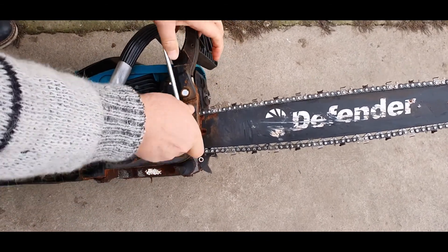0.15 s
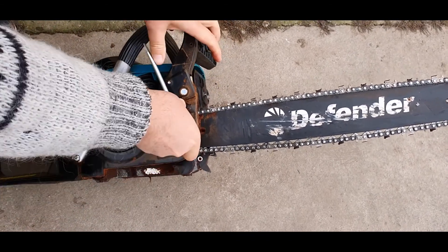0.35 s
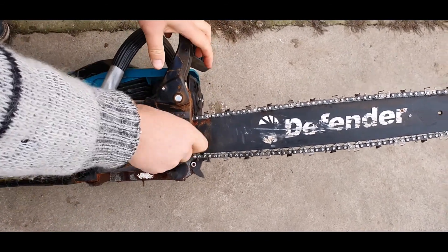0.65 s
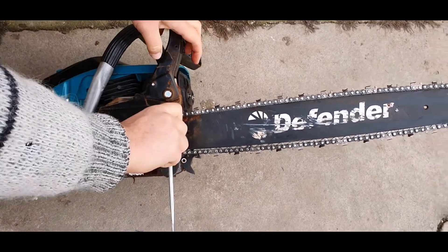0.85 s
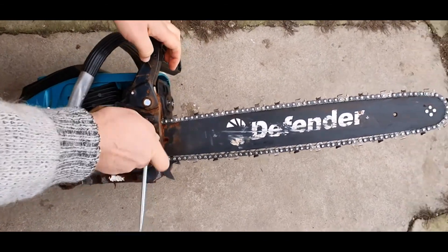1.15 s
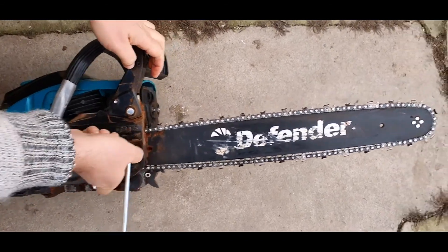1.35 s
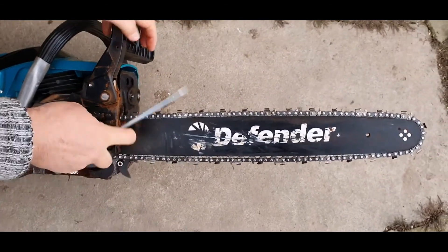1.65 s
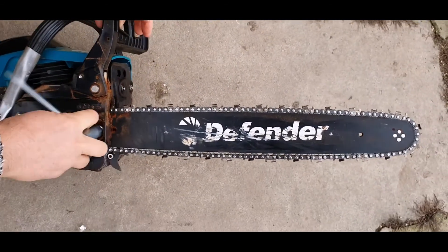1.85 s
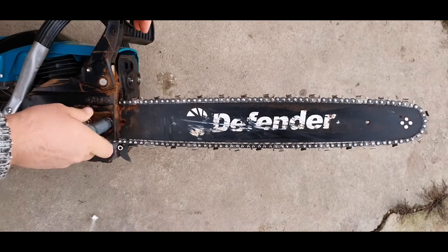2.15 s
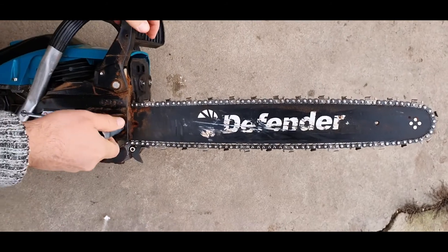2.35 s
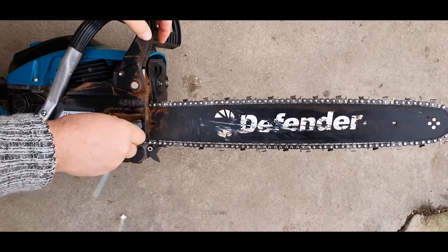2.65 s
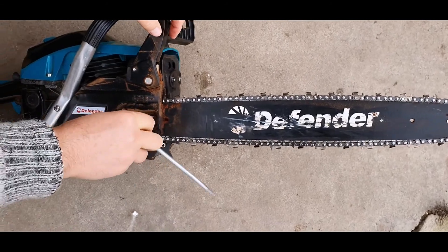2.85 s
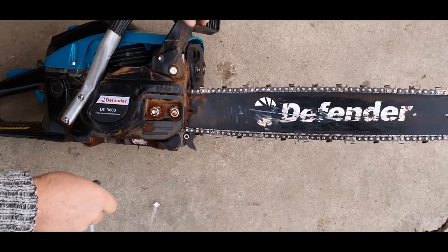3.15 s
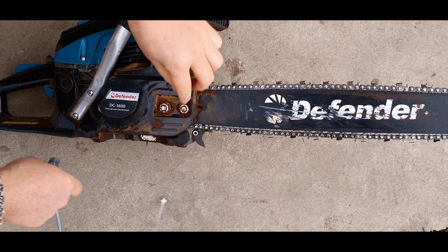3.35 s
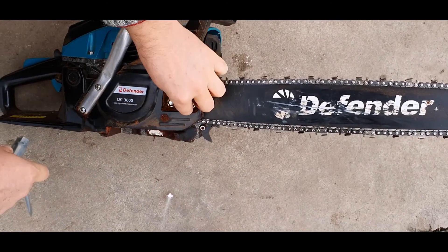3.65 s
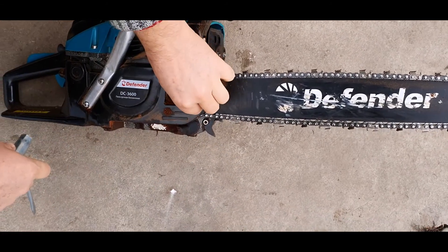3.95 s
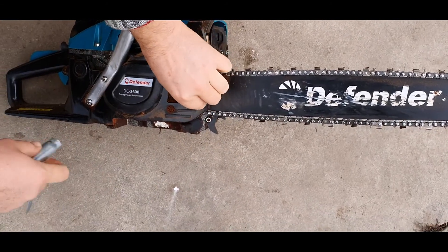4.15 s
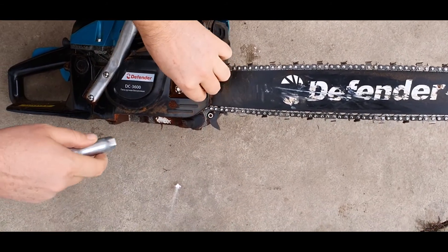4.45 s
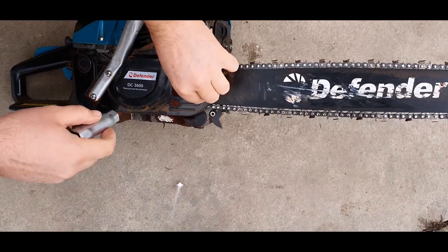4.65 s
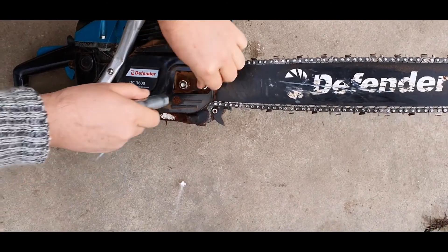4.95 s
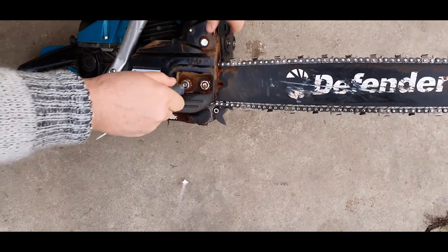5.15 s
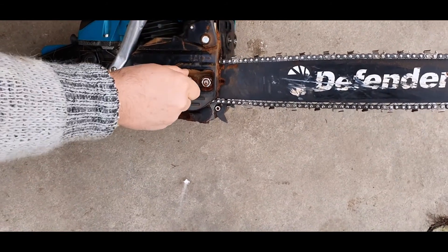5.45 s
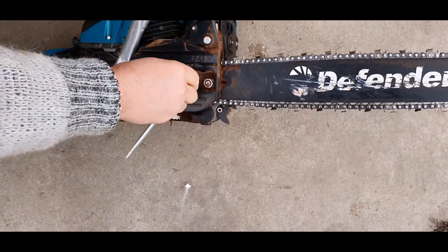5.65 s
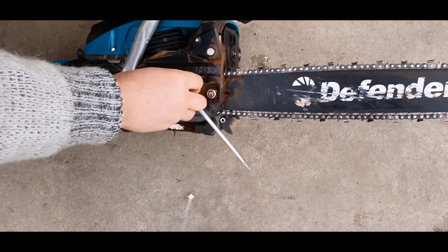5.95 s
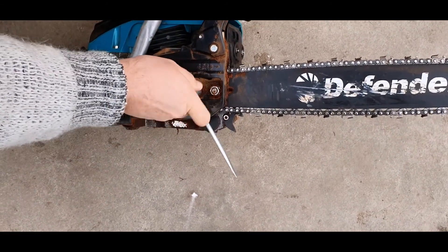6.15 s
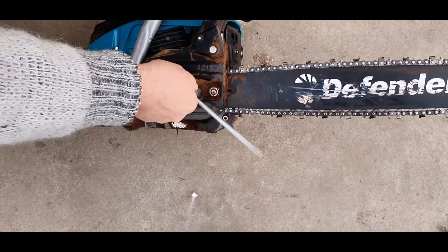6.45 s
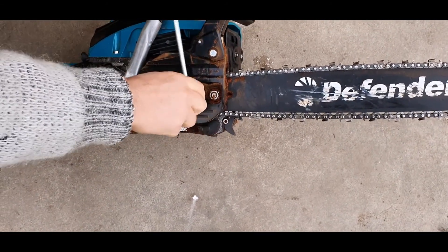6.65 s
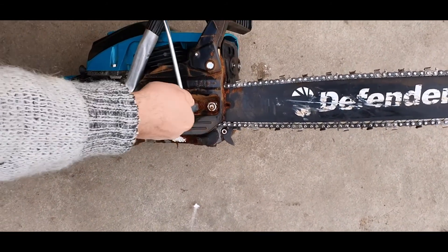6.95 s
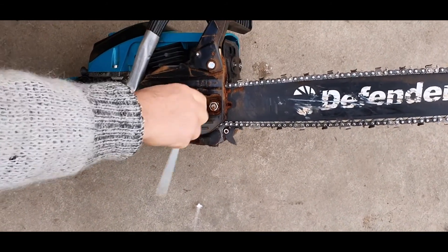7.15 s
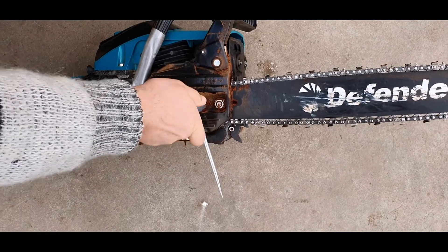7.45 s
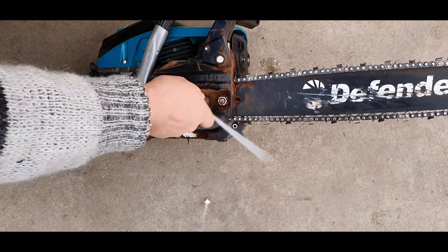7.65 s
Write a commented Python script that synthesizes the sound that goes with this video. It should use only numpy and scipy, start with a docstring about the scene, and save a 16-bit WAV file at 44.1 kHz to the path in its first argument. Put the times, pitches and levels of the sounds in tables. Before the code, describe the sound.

Outdoors on concrete beside a road, a vehicle approaches with low rumble, engine drone and tyre hiss, swells to its loudest near the middle and recedes at a lower engine pitch. Close up, a steel wrench makes faint ticks, then sharp clacks on a chainsaw cover around two seconds. A loud dry snap and softer knocks come just after five, then small ticks and light scrapes. Close stereo microphones, very short outdoor reflections.

```python
"""Outdoors on concrete by a road: a steel socket wrench works the two cover nuts of a chainsaw.
Knocks are damped modes of cover and wrench plus a noise crack; dry ticks are short snaps with grit;
scrapes are swells of clumped noise; the wrench sings briefly at its strongest mode.
A motor vehicle drives by: engine lines and coloured road noise swell and fade with distance,
and the engine slows as it leaves. Two close microphone ports hear it all."""
import sys
import numpy as np
from scipy import signal
from scipy.fft import rfft, irfft
from scipy.io import wavfile
from scipy.ndimage import uniform_filter1d, map_coordinates

SR = 44100
rng = np.random.default_rng(int(sys.argv[2]) if len(sys.argv) > 2 else 0)


def log_audio(samples):
    """Write samples as a 16-bit WAV file to the path given in sys.argv[1]."""
    # one column per channel
    frames = np.atleast_2d(samples).T
    # limit to full scale, then quantise
    limited = np.clip(frames, -1, 1)
    pcm = np.round(limited * 32767).astype(np.int16)
    wavfile.write(sys.argv[1], SR, pcm)


N = 343980
TIME_S = np.arange(N) / SR
BINS_HZ = np.fft.rfftfreq(N, 1 / SR)

# Vehicle levels are before the trims in its functions; spectra are relative.
# Engine speed, dropping as the driver eases off: (time [s], firing rate [Hz])
FIRING_RATE = [(0, 80.73), (.85, 81.85), (1.15, 87.45), (2.2, 91.73), (3.8, 95.33), (6.15, 92.6),
               (6.55, 77.05), (6.9, 76.3), (7.8, 76.3)]
# Exhaust drone near the firing rate: (time [s], level [dB])
DRONE_LEVEL = [(0.0, -51.5), (1.37, -47), (1.74, -36), (2.0, -46), (2.82, -37.5), (2.85, -46.5),
               (3.06, -29), (3.1, -36), (3.63, -19), (3.91, -16), (4.23, -30.5), (4.71, -25), (4.93, -34.5),
               (5.02, -26.5), (5.56, -30), (5.65, -38.5), (6.0, -34.5), (6.54, -49), (6.62, -31.5),
               (6.78, -45.5), (6.86, -33), (7.28, -45.5), (7.34, -38), (7.8, -42)]
# Exhaust overtone at twice the firing rate: (time [s], level [dB])
OVERTONE_LEVEL = [(0.0, -58), (0.61, -54.5), (1.72, -43.5), (1.78, -59.5), (3.93, -34), (4.0, -45),
                  (4.32, -31), (4.91, -49), (6.32, -46.5), (6.41, -63.5), (6.8, -44), (7.8, -60.5)]
# Low boom of fixed pitch: (time [s], level [dB])
BOOM_LEVEL = [(0, -53), (1.5, -50), (3.0, -40.5), (3.35, -29), (3.85, -26.5), (4.55, -45), (4.95, -34),
              (6.4, -43.5), (7.8, -55.5)]
# Strongest body hum, in gusts: (time [s], level [dB])
STRONGEST_HUM_LEVEL = [(0.06, -59), (0.08, -55.5), (1.78, -51.5), (2.0, -38.5), (2.04, -49.5), (2.6, -45.5),
                       (2.65, -36), (2.73, -51), (3.01, -41.5), (3.25, -47.5), (3.29, -39.5), (3.85, -39),
                       (4.33, -33.5), (4.41, -43), (4.52, -31.5), (4.86, -42.5), (4.95, -33.5),
                       (5.1, -45.5), (5.15, -30), (5.26, -41.5), (5.41, -37.5), (5.45, -52), (5.51, -36.5),
                       (5.71, -41), (7.76, -59.5), (7.8, -49)]
# Other body hums: (frequency [Hz], level re carried hum [dB], width [Hz])
BODY_HUMS = [(211.4, -9.5, 22), (391.6, -16.5, 7.3), (487.6, -15.5, 28)]
# Low rumble: (frequency [Hz], density [dB per Hz])
RUMBLE_SPECTRUM = [(20, -27), (32, -21), (42, -19.5), (52, -7.5), (65, 15.5), (90, 17.5), (120, 15.5),
                   (150, 8.5), (210, 10), (300, -13), (450, -50.5)]
# Mid-range roar: (frequency [Hz], density [dB per Hz])
ROAR_SPECTRUM = [(170, -40), (290, -7), (313, -7.5), (359, -8), (392, -28), (423, -3), (456, -15),
                 (498, -4), (601, -6), (762, -1.5), (926, -8.5), (1110, -10.5), (1300, -5.5), (1690, -51.5),
                 (2860, -120)]
# Mid-range engine churn: (frequency [Hz], density [dB per Hz])
CHURN_SPECTRUM = [(120, -72.5), (220, -28), (320, 5), (420, -1), (510, 8), (620, 0.5), (780, -15.5),
                  (1100, -41.5), (2500, -110)]
# Near tyre hiss, vehicle coming: (frequency [Hz], density [dB per Hz])
TYRES_COMING_SPECTRUM = [(650, -37), (1050, -12), (1300, 2), (1700, 5), (2350, -4.5), (2850, -2),
                         (3300, -2), (3800, -6), (4500, -18.5), (5100, -24), (5550, -14), (6300, -21.5),
                         (7810, -19), (9140, -26), (11600, -36), (15100, -49), (16000, -44.5)]
# Near tyre hiss from behind: (frequency [Hz], density [dB per Hz])
TYRES_GOING_SPECTRUM = [(650, -36.5), (1050, -9), (1300, 0.5), (1700, 0.5), (2350, -0.5), (2850, -4.5),
                        (3300, -7), (3750, -10.5), (4700, -16.5), (5600, -21), (6390, -21), (7810, -20.5),
                        (9140, -25.5), (11000, -30), (16000, -47.5)]
# Far tyre hiss: (frequency [Hz], density [dB per Hz])
TYRES_FAR_SPECTRUM = [(650, -7.5), (1100, -1.5), (1180, -7.5), (1460, 3.5), (1970, -1.5), (2360, -9),
                      (2920, -16), (5900, -33), (7720, -93), (16000, -90.5)]
# Uneven surges of the tyre hiss: (time [s], level change [dB])
TYRE_SURGES = [(0, 0.7), (2.3, 0.86), (2.85, -1.1), (3.25, 0.9), (3.34, -1.6), (3.44, 1.2), (3.52, -1.5),
               (3.65, 0.1), (3.85, 0.8), (4.0, -1.5), (4.35, -1.7), (4.55, -0.6), (5.6, -0.82), (7.8, -1)]
# Side of the hiss's middle band, moving in from the right: (time [s], left minus right [dB])
HISS_CROSSING = [(0, -8.5), (3.7, -8), (4.6, -4.5), (5.4, -2.5), (6.3, 1), (7.8, 1.5)]
# How each vehicle part carries: part: (top level [dB], loudest point past nearest [m],
# falloff coming [1 = inverse distance], falloff going [1 = inverse distance])
CARRY_BY_PART = { "tyres": (-43.5, 0.77, 1.2635, 1), "roar": (-45, 2.5, 0.87, 0.73),
                 "churn": (-40.5, 3, 1.43, 1.5), "rumble": (-35.5, 3.5, 0.81, 1.02),
                 "hum": (-34.5, 4.5, 1.2, 1.5), "shudder": (-46, -3.5, 1.5, 0.3), }
# Road noise alike in the two ports: (frequency [Hz], likeness [0-1])
PORT_LIKENESS = [(60, .99), (150, .96), (300, .8), (600, .6), (1300, .68), (2200, .52), (4500, .35),
                 (6500, .12), (8000, .02)]
# Road noise balance: (frequency [Hz], left minus right [dB])
PORT_LEAN = [(60, 0.5), (500, -0.5), (1200, -1), (3300, -1), (5000, 1.5), (6800, 0.5), (8300, 8.5),
             (9800, 0), (15000, 1)]
# Vehicle sound reaches the left port first: (time [s], lead [ms])
LEFT_LEAD = [(0, 0.37), (3.8, 0.42), (4.6, 0.36), (6.2, 0.37), (7.8, 0.43)]
# Dry ticks, some far to one side like handling of the recorder:
# (time [s], level [dB], centre [Hz], decay to 1/e [cycles], left minus right [dB])
TICK_EVENTS = [(0.9816, -44, 3540, 0.66, 1), (0.981, -46, 7200, 0.96, 11), (1.079, -45, 7000, .5, 6),
               (1.083, -37, 6500, .5, 6), (1.085, -31, 4400, 0.28, 12), (1.104, -41, 3570, 1.1, -10),
               (1.135, -41, 8000, .5, 5), (1.447, -44, 7500, .5, 2), (1.49, -34, 4330, 1, -3),
               (1.4968, -28.5, 3900, 1.04, -2), (1.496, -38, 2000, 0.37, -6), (1.4984, -32, 9500, .4, 0),
               (1.507, -45, 5300, .6, 0), (1.547, -45, 7000, .8, 0), (1.8175, -38.5, 3004, .8, -2.5),
               (1.8335, -35, 8200, 20, 25), (1.906, -40.5, 3600, .8, -3), (5.083, -19, 8250, 0.54, 15),
               (5.1121, -12.8, 2920, 1.3, 34), (5.1121, -17.5, 1350, .35, 30),
               (5.1121, -14.5, 6500, .7, 36), (5.1124, -18, 13000, 1, 36), (5.1185, -29, 3200, 0.63, 29),
               (5.118, -24, 7400, .6, 28), (5.8095, -35, 10500, .79, -11), (5.83, -23, 10500, 0.52, -18),
               (5.9228, -24, 3630, 0.6, -25), (5.9227, -35, 1900, 0.44, -15), (5.923, -28, 10000, 0.7, -18),
               (5.9295, -36, 7000, .35, -15), (5.9689, -44, 8000, .7, -8), (6.814, -36, 8300, .9, 8),
               (6.8203, -32, 7750, 1.8, 15), (6.82, -36, 11800, 1.5, 8), (6.8243, -31, 11200, 0.87, 5),
               (6.824, -47, 2600, .4, 3), (6.854, -34, 7900, 1.8, 13), (6.8542, -44, 3000, .4, 6),
               (6.9447, -36.5, 5900, 0.48, 17.5), (6.954, -49, 7500, .5, 8)]
# Socket scraping over a nut: (peak time [s], rise [s], fall [s], level [dB], centre [Hz],
# half-width [octaves], left minus right [dB])
SCRAPE_EVENTS = [(1.101, 0.034, 0.054, -61.5, 5600, 1, 0), (1.493, .005, 0.0054, -51, 4200, 0.61, -4),
                 (1.5, 0.014, 0.06, -54.5, 3730, 0.64, -2), (1.495, 0.01, 0.037, -56.5, 8200, 0.81, 4),
                 (5.108, 0.009, 0.0042, -35.5, 3200, 1, 22), (5.17, 0.036, .022, -64, 12500, 1, 4),
                 (5.826, 0.017, .01, -58, 8920, 1, -3), (5.899, 0.15, 0.12, -57, 2930, .7, -15),
                 (5.92, 0.011, 0.006, -54, 6450, 1, -9), (6.19, 0.088, 0.064, -69.5, 4200, .4, -5),
                 (6.822, 0.0096, .013, -55, 10000, 0.66, 2), (7.19, 0.1, 0.044, -75.5, 7000, 0.66, -2)]
# Saw cover modes, before each knock's pitch ratio: (frequency [Hz], level [dB], t60 [s])
COVER_MODES = [(690, -3, .013), (900, 6, .012), (1027, 7, .011), (1246, -2, .018), (1420, -9, .014),
               (1660, 1, .012), (2000, -3, .01), (2370, 10.5, .012), (2800, 1, .011), (3350, -2, .01),
               (4100, 7, .013)]
# Steel wrench modes: (frequency [Hz], level [dB], t60 [s])
WRENCH_MODES = [(4667, -2, .135), (4858, 4.5, .07), (5545, -18, .07), (6158, -23, .18), (6589, -28, .14),
                (7779, -16, .145), (8210, -27, .13), (8360, -23, .08), (8683, -14, .065), (9313, -14, .07),
                (11740, -24, .125), (13990, -30, .09), (14620, -27, .08)]
# Crack of steel on steel: (frequency [Hz], density [dB per Hz])
CRACK_SPECTRUM = [(400, -34), (800, -8.5), (1300, -8), (2000, -7.5), (4000, -13.5), (5500, -17),
                  (8200, -17), (10000, -23), (15000, -32.5)]
# Wrench knocking a nut: (time [s], cover level [dB], centre of cover response [Hz], its half-width [octaves],
# cover pitch [ratio], crack level [dB], crack t60 [s], crack top [Hz], wrench level [dB],
# left minus right [dB])
KNOCK_EVENTS = [(1.8302, -11.5, 1300, .25, 1.0, -27, .036, 14000, -41, .5),
                (1.832, -32, 2450, .35, 1.03, -37, .03, 9000, -62, 0),
                (1.9206, -21, 3800, .6, 1.01, -21, .012, 5000, -27, -6.5),
                (1.9211, -7.5, 1060, .88, .99, -20, .019, 3500, -62, 1.5),
                (1.9412, -25, 1200, .7, 1, -30, .024, 3500, -58, 2),
                (2.108, -36.5, 950, .32, .95, -60, .02, 4000, -75, 0),
                (2.765, -36, 1400, .81, 1.04, -56, .02, 4000, -73, -9),
                (5.2318, -28.5, 904, .23, 1.06, -60, .02, 4000, -75, 3),
                (5.3754, -27, 2700, .5, 1.04, -35, .03, 3800, -58, -5),
                (5.3767, -21, 1350, .13, 1.08, -41, .025, 3500, -61, 5),
                (5.3812, -30, 1350, .2, 1.07, -38, .02, 5000, -58, 0),
                (7.012, -30, 693, .13, 1, -54, .02, 2000, -82, -4),
                (7.068, -33, 1300, .45, 1.05, -52, .019, 3000, -90, -1)]
# Turning socket makes the wrench sing: (peak time [s], rise [s], fall [s], level [dB])
SING_EVENTS = [(2.577, .026, 0.02, -57), (5.380, 0.0033, 0.013, -40)]
# Echoes off the ground and a wall: (delay [s], level [dB])
YARD_ECHOES = [(.0022, -11.5), (.0046, -37.5), (0.024, -32)]

NEAREST_S, SPEED_M_PER_S, ROAD_DISTANCE_M = 3.836, 8.82, 6.09
ENGINE_PAN_DB = -0.6
CHURN_FLUTTER_DB, TYRE_FLUTTER_DB = 2.8, 0.6  # complex rms; the real part is used
DULL_FROM_S, DULL_TAKES_S, DULL_ABOVE_HZ, DULL_DB = 6.08, 0.04, 1860, -3
EDGE_HZ = 15900


def gain_of(db):
    """Decibels to amplitude."""
    return 10 ** (np.asarray(db) / 20)


def evened(x):
    """Scales to rms 1."""
    return x / np.sqrt(np.mean(abs(x) ** 2) + 1e-20)


def read(points, hz):
    """Interpolates (Hz, value) points on a log-frequency axis."""
    point_hz, value = np.transpose(points)
    return np.interp(np.log(hz + 1), np.log(point_hz + 1), value)


def curve(points):
    """Interpolates (s, value) points to one value a sample."""
    point_s, value = np.transpose(points)
    return np.interp(TIME_S, point_s, value)


def bell(hz, centre_hz, octaves):
    """Hump on the log-frequency axis, a quarter high at the given octaves from centre."""
    return 1 / (1 + (np.log2((hz + 1) / centre_hz) / octaves) ** 2) ** 2


def wander(rate_hz):
    """Slow complex noise of rms 1, low-passed by a Gaussian."""
    noise = rng.standard_normal(N) + 1j * rng.standard_normal(N)
    lowpass = np.exp(-(np.fft.fftfreq(N, 1 / SR) / rate_hz) ** 2)
    return evened(np.fft.ifft(np.fft.fft(noise) * lowpass))


def swell(t_s, rise_s, fall_s):
    """Exponential growth to 1 at t = 0, then exponential decay."""
    return np.exp(np.minimum(t_s / abs(rise_s), -t_s / abs(fall_s)))


def burst(envelope, colour):
    """Enveloped noise, then coloured; its energy stays that of the envelope."""
    size = envelope.shape[-1]
    noise = rng.standard_normal((2, size)) * envelope
    grit = irfft(rfft(noise) * colour(np.fft.rfftfreq(size, 1 / SR)), size)
    return grit / np.linalg.norm(grit, axis=1, keepdims=True) * np.linalg.norm(envelope)


def add(mix, start_s, sound, pan_db):
    """Adds a sound to both channels at its start, panned at constant power."""
    sides = gain_of([[pan_db / 2], [-pan_db / 2]])
    part = mix[:, max(round(start_s * SR), 0):][:, :sound.shape[-1]]
    part += (evened(sides) * sound)[:, :part.shape[1]]


def passing(top_db, past_m, coming, going):
    """Level [dB] falling with distance from where a vehicle part is loudest."""
    along_m = SPEED_M_PER_S * (TIME_S - NEAREST_S) - past_m
    spread_db = 20 * np.log10(np.hypot(1, along_m / ROAD_DISTANCE_M))
    return top_db - spread_db * np.where(along_m < 0, coming, going)


def engine_order(turns, multiple, rough, width_hz):
    """Line at a multiple of the turning rate, blurred by uneven running; rms 1."""
    rough = np.clip(rough, 0, 1)
    height = np.sqrt(1 - rough ** 2) + rough * wander(width_hz)
    phase = 2j * np.pi * (multiple * turns + rng.random())
    return evened((height * np.exp(phase)).real)


def road_noise(spectrum):
    """Coloured noise, partly alike in the two ports; rms 1."""
    a, b = rfft(rng.standard_normal((2, N)))
    same = np.clip(read(PORT_LIKENESS, BINS_HZ), 0, 1)
    pair = np.array([a, same * a + np.sqrt(1 - same ** 2) * b])
    sides = gain_of(np.outer([.5, -.5], read(PORT_LEAN, BINS_HZ)))
    return evened(irfft(pair * sides * gain_of(read(spectrum, BINS_HZ)), N))


def engine_and_hums(hum_db):
    """Orders that follow the firing rate, plus a boom and body hums of fixed pitch."""
    turns = np.cumsum(curve(FIRING_RATE)) / SR
    out = gain_of(curve(DRONE_LEVEL) - 0.55) * engine_order(turns, 0.99, rough=0.21, width_hz=8.1)
    out += gain_of(curve(OVERTONE_LEVEL) - 3.0) * engine_order(turns, 2, rough=0.25, width_hz=13)
    out += gain_of(hum_db - 12.0) * engine_order(turns, 3, rough=0.96, width_hz=7.3)
    # with time as the turns, the multiple is in Hz
    out += gain_of(curve(BOOM_LEVEL) - 2.4) * engine_order(TIME_S, 56.8, rough=0.29, width_hz=20)
    for hz, db, width_hz in BODY_HUMS:
        out += gain_of(hum_db + db) * engine_order(TIME_S, hz, rough=0.916, width_hz=width_hz)
    strongest_hum = engine_order(TIME_S, 246, rough=0.9, width_hz=24.4)
    return out + gain_of(curve(STRONGEST_HUM_LEVEL) - 1.0) * strongest_hum


def low_rumble(rumble_db, shudder_db):
    """Low coloured noise and a blurred 43 Hz shudder common to both ports."""
    shudder = engine_order(TIME_S, 43, rough=0.81, width_hz=12)
    return gain_of(rumble_db) * road_noise(RUMBLE_SPECTRUM) + gain_of(shudder_db) * shudder


def roar_and_churn(roar_db, churn_db):
    """Mid-range noise: a steady roar and a fluttering engine churn."""
    roar = gain_of(roar_db + 4.5) * road_noise(ROAR_SPECTRUM)
    flutter_db = CHURN_FLUTTER_DB * wander(17).real
    return roar + gain_of(churn_db + flutter_db) * road_noise(CHURN_SPECTRUM)


def tyre_hiss(tyres_db):
    """Surging hiss, crossfaded from far to near and from coming to going."""
    near = np.clip(gain_of(0.58 * (tyres_db - tyres_db.max()) - 0.1), 0, 1)
    going = .5 + .5 * np.tanh((TIME_S - NEAREST_S) * SPEED_M_PER_S / ROAD_DISTANCE_M)
    close = np.sqrt(1 - going) * road_noise(TYRES_COMING_SPECTRUM)
    close += np.sqrt(going) * road_noise(TYRES_GOING_SPECTRUM)
    hiss = near * close + np.sqrt(1 - near ** 2) * road_noise(TYRES_FAR_SPECTRUM)
    flutter_db = TYRE_FLUTTER_DB * wander(14).real
    return hiss * gain_of(tyres_db + 4.0 + curve(TYRE_SURGES) + flutter_db)


def drawing_away(hiss):
    """The hiss's middle band moves in from the right; its treble drops once the vehicle is well past."""
    gone = .5 + .5 * np.tanh((TIME_S - DULL_FROM_S) / DULL_TAKES_S)
    treble = irfft(rfft(hiss) * (1 - 1 / (1 + (BINS_HZ / DULL_ABOVE_HZ) ** 20)), N)
    hiss = hiss - (1 - gain_of(DULL_DB)) * gone * treble
    middle = irfft(rfft(hiss) * bell(BINS_HZ, centre_hz=2900, octaves=0.93), N)
    sides = gain_of(np.outer([.5, -.5], curve(HISS_CROSSING)))
    return hiss + middle * (sides - 1)


def vehicle():
    """Engine, rumble, roar and tyres pass by, reaching the left port first."""
    level_db = {part: passing(*row) for part, row in CARRY_BY_PART.items()}
    engine_sides = gain_of([[ENGINE_PAN_DB / 2], [-ENGINE_PAN_DB / 2]])
    both = engine_and_hums(level_db["hum"]) * engine_sides
    both = both + low_rumble(level_db["rumble"], level_db["shudder"])
    both += roar_and_churn(level_db["roar"], level_db["churn"])
    both += drawing_away(tyre_hiss(level_db["tyres"]))
    left, right = both
    late = np.arange(N) - curve(LEFT_LEAD) * SR / 1000
    return np.array([left, map_coordinates(right, [late], order=3, mode="nearest")])


def ticks(rise_s=0.0001, fall_s=0.00075, octaves=2.27, grit_db=-14, rise_share=0.91):
    """Tiny ticks: a short snap of a swelling sine and a pinch of grit."""
    out, t_s = np.zeros((2, N)), np.arange(-512, 1536) / SR
    for s, db, centre_hz, cycles, pan_db in TICK_EVENTS:
        decay_s = cycles / centre_hz
        snap = swell(t_s, rise_share * decay_s, decay_s) * np.sin(2 * np.pi * centre_hz * t_s)
        grit_envelope = gain_of(grit_db) * swell(t_s, rise_s, fall_s)
        grit = burst(grit_envelope, lambda hz: bell(hz, centre_hz, octaves))
        add(out, s + t_s[0], gain_of(db) * (snap + grit), pan_db)
    return out


def scrapes(grain_db=5):
    """Steel slides on a rusty nut: a short swell of clumped grit."""
    out, t_s = np.zeros((2, N)), np.arange(-SR // 2, SR // 2) / SR
    for s, rise_s, fall_s, db, centre_hz, octaves, pan_db in SCRAPE_EVENTS:
        grain = evened(uniform_filter1d(rng.standard_normal(len(t_s)), size=28))
        clumps = evened(gain_of(grain_db * grain))
        envelope = gain_of(db) * clumps * swell(t_s, rise_s, fall_s)
        add(out, s + t_s[0], burst(envelope, lambda hz: bell(hz, centre_hz, octaves)), pan_db)
    return out


def ring(modes, t_s, colour):
    """Damped sines of alternating sign that start at t = 0."""
    t_s = np.maximum(t_s, 0)
    out = np.zeros_like(t_s)
    for k, (hz, db, t60_s) in enumerate(modes):
        decay = gain_of(db - 60 * t_s / t60_s)
        out += (-1) ** k * colour(hz) * decay * np.sin(2 * np.pi * hz * t_s)
    return out


def knocks(lead_s=0.00027):
    """A noise crack, a short cover clack and a longer wrench ring; the rings reach the left first."""
    out, t_s = np.zeros((2, N)), np.arange(-256, SR // 4) / SR
    at_ports_s = np.array([t_s, t_s - lead_s])
    wrench = ring(WRENCH_MODES, at_ports_s, np.ones_like)
    for (s, cover_db, centre_hz, octaves, pitch, crack_db, crack_t60_s, top_hz,
         wrench_db, pan_db) in KNOCK_EVENTS:
        modes = [(hz * pitch, db, t60_s) for hz, db, t60_s in COVER_MODES]
        cover = ring(modes, at_ports_s, lambda hz: bell(hz, centre_hz, octaves))
        envelope = gain_of(crack_db - 60 * t_s / crack_t60_s) * (t_s >= 0)
        crack = burst(envelope,
                      lambda hz: gain_of(read(CRACK_SPECTRUM, hz)) / np.hypot(1, (hz / top_hz) ** 2))
        add(out, s + t_s[0], gain_of(cover_db) * cover + gain_of(wrench_db) * wrench + crack, pan_db)
    return out


def sings():
    """Friction feeds the wrench's strongest mode: a phase-wandering tone swells and dies."""
    out, t_s = np.zeros((2, N)), np.arange(-SR // 8, SR // 8) / SR
    strongest_hz = max(WRENCH_MODES, key=lambda mode: mode[1])[0]
    for s, rise_s, fall_s, db in SING_EVENTS:
        tone = np.sin(2 * np.pi * strongest_hz * t_s + 0.9 * wander(60).real[:len(t_s)])
        envelope = swell(t_s, rise_s, fall_s) * signal.windows.hann(len(t_s))
        add(out, s + t_s[0], gain_of(db) * envelope * tone, 0)
    return out


def yard(x, wet_db, t60_s, dull_hz):
    """Adds a few dulled echoes and a thin, short noise scatter by convolution."""
    t_s = np.arange(SR // 3) / SR
    tail = rng.standard_normal((2, len(t_s))) * gain_of(-60 * t_s / t60_s)
    tail *= gain_of(-9.0) / np.linalg.norm(tail[0])
    for delay_s, db in YARD_ECHOES:
        tail[:, round(delay_s * SR)] += gain_of(db)
    wet = signal.fftconvolve(x, tail, axes=1)[:, :N]
    b, a = signal.butter(1, min(dull_hz, SR / 3), fs=SR)
    return x + gain_of(wet_db) * signal.lfilter(b, a, wet)


def scene():
    """The vehicle, the close ticks, scrapes and blows, and a faint even hiss."""
    passing_vehicle = vehicle()
    small_sounds = yard(ticks() + scrapes(), wet_db=-3.0, t60_s=0.067, dull_hz=8850)
    # small parts radiate little bass
    highpass = signal.butter(2, 620, "highpass", fs=SR, output="sos")
    struck = signal.sosfilt(highpass, knocks())
    blows = yard(struck + sings(), wet_db=2.0, t60_s=0.092, dull_hz=6000)
    hiss = gain_of(-104) * rng.standard_normal((2, N))
    return passing_vehicle + small_sounds + blows + hiss


def record(dry):
    """The microphone ports swallow a band high in the treble; then a low-pass limits the band."""
    notch = gain_of(-9 * bell(BINS_HZ, centre_hz=9650, octaves=0.32))
    heard = irfft(rfft(dry) * notch, N)
    lowpass = signal.firwin(511, EDGE_HZ, window=("kaiser", 9), fs=SR)
    return signal.oaconvolve(heard, lowpass[None], "same")


dry = scene()
out = record(dry)
log_audio(out)
```